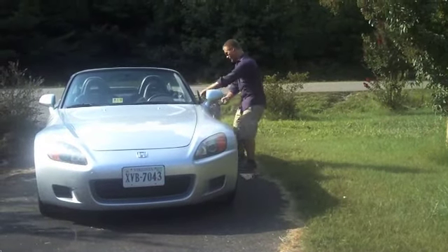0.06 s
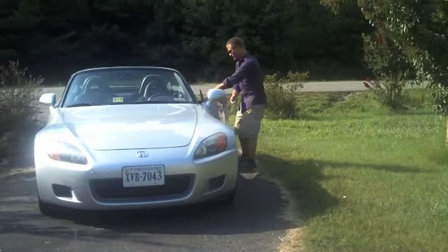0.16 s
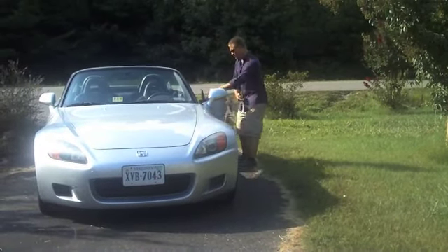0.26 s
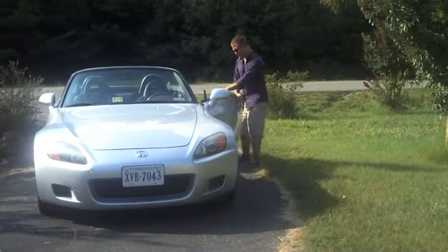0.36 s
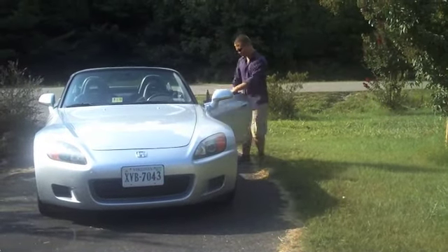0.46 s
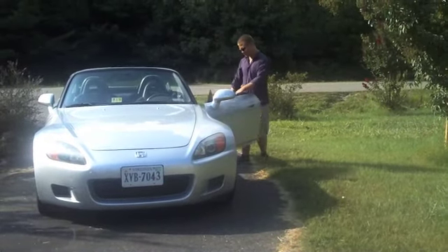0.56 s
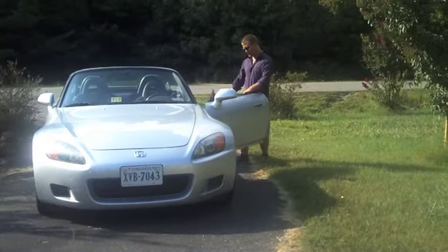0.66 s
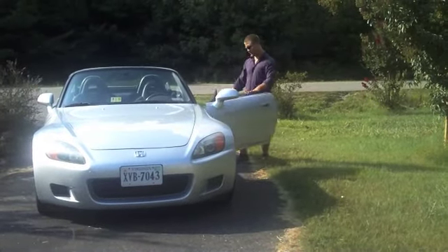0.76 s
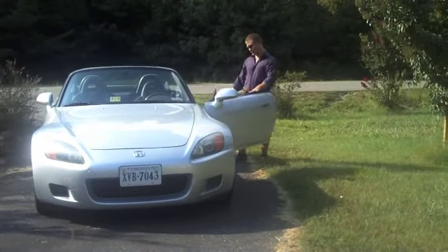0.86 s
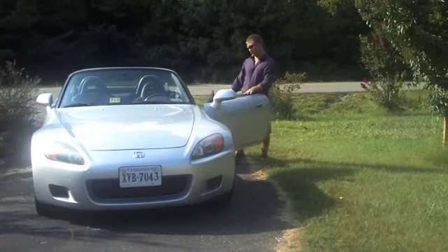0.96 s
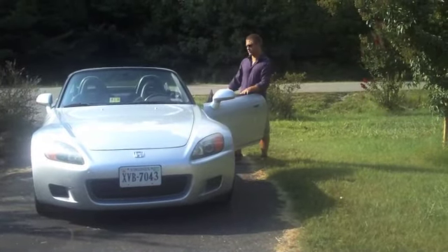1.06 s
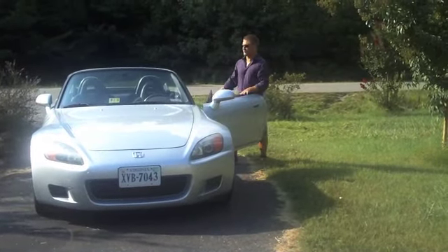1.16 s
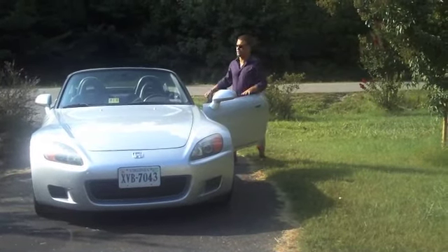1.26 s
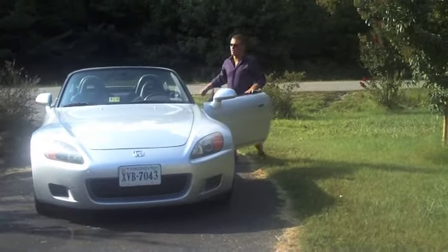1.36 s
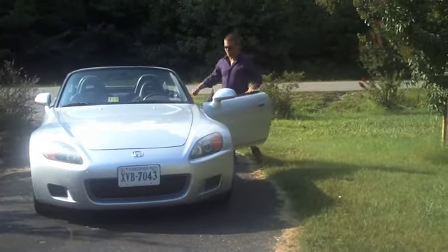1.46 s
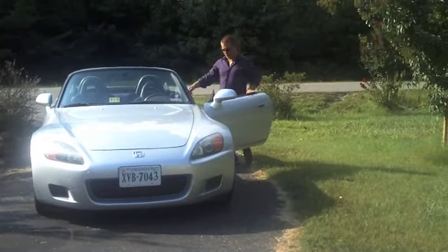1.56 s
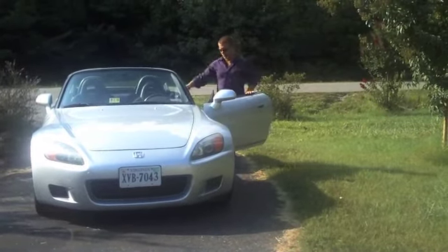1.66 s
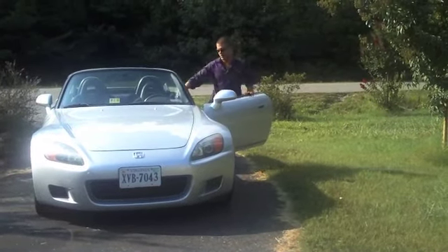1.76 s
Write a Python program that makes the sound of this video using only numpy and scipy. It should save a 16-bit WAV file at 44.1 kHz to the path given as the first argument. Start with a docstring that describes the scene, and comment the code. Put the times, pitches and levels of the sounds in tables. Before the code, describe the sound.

A car door is opened: a sharp metallic latch click with a low, short thump, then rubber seal scuffs and a soft hinge knock, over faint bird chirps and distant rumble, with a gritty low-quality microphone.

```python
"""Car door opening on a quiet lawn

Steel clicks and door modes make the latch snap; a low sine thumps as the panel leaves its seal.
Grainy noise scuffs like rubber, and a few modes give the soft knock of the hinge stay.
Swept sines chirp faintly like a bird over coloured-noise rumble, rustle and a late soft rush.
A low-rate sample and hold mirrors the sound into a gritty treble.
"""
import sys
import numpy as np
from scipy import signal
from scipy.fft import rfft, irfft
from scipy.io import wavfile
from scipy.ndimage import uniform_filter1d

SR = 44100
rng = np.random.default_rng(int(sys.argv[2]) if len(sys.argv) > 2 else 0)


def unload_audio(sound):
    """Save the sound as a 16-bit wav file, at the path given as the first command line argument."""
    columns = np.transpose(np.atleast_2d(sound))
    # keep every value between -1 and 1, then stretch to whole-number steps
    steps = np.round(np.clip(columns, -1, 1) * 32767)
    wavfile.write(sys.argv[1], SR, steps.astype(np.int16))


N = 79380  # length [samples]
CONTACT_S = 0.00018  # time constant of a hard contact's onset


def undb(db):
    """Decibels to gain."""
    return 10 ** (np.asarray(db) / 20)


def since(start):
    """Seconds since a moment, zero before it."""
    return np.maximum(np.arange(N) / SR - start, 0)


def fade(start, rise, t60):
    """Envelope of a blow: rise with a time constant, exponential fall by 60 dB in t60 seconds."""
    t = since(start)
    return (1 - np.exp(-t / rise)) * np.exp(-np.log(1000) * t / t60)


def colour(x, points):
    """Filter by a (frequency [Hz], level [dB]) curve, drawn on a log frequency axis."""
    hz, db = np.array(points, float).T
    f = np.maximum(np.arange(N // 2 + 1) * SR / N, 1)
    gain = undb(np.interp(np.log(f), np.log(hz), db))
    return irfft(rfft(x) * gain, N)


def noise(points, grain_db=0):
    """Coloured noise of unit RMS; grain gives each run of 20 samples its own random size."""
    grains = np.repeat(rng.standard_normal(N // 20 + 1), 20)[:N]
    x = colour(rng.standard_normal(N) * undb(grain_db * grains), points)
    return x / x.std()


def walk(rate):
    """Smooth random wander around zero, with `rate` new targets a second."""
    k = int(SR / rate)
    steps = np.repeat(rng.standard_normal(N // k + 1), k)
    return uniform_filter1d(uniform_filter1d(steps, k), k)[:N]


def swell(points, levels):
    """Coloured noise that follows a (time [s], level [dB]) curve."""
    return noise(points) * undb(np.interp(since(0), *np.array(levels).T))


def ring(start, modes):
    """Struck modes: sines that start together and die away at their own rates."""
    t = since(start)
    return sum(undb(db) * fade(start, CONTACT_S, t60) * np.sin(2 * np.pi * hz * t)
               for hz, db, t60 in modes)


# colour of the microphone hiss: (frequency [Hz], relative level [dB])
HISS_COLOUR = [(100, 14), (700, -6), (3000, 5.5), (5700, 1)]
HISS_DB = -72


def hiss():
    """Microphone hiss: unrelated noise on left and right."""
    return undb(HISS_DB) * np.array([noise(HISS_COLOUR), noise(HISS_COLOUR)])


# colour of the distant outdoor rumble: (frequency [Hz], relative level [dB])
AIR_COLOUR = [(8, -15.5), (20, -2), (48, 0.5), (85, -8.5), (124, -11), (200, -17), (350, -20.5), (550, -25),
              (800, -26.5), (1040, -26.5), (2200, -35.5), (4800, -39.5), (5700, -47.5)]
AIR_DB, AIR_WAVER_DB = -50.5, 1
# level of the soft rush before flutter: (time [s], level [dB])
RUSH_SWELL = [(1.15, -72), (1.21, -61), (1.3, -57), (1.37, -65), (1.5, -62), (1.59, -57.5), (1.69, -68),
              (1.8, -62)]
# colour of the soft rush: (frequency [Hz], relative level [dB])
RUSH_COLOUR = [(100, -31), (250, 13), (550, 13), (1100, -6.5), (2500, -34.5), (5700, -53)]


def outdoors(flutter_db=2.5):
    """Gently wavering distant rumble, and a soft, fluttering rush that swells late."""
    rumble = undb(AIR_DB) * noise(AIR_COLOUR) * undb(AIR_WAVER_DB * walk(8.7))
    rush = swell(RUSH_COLOUR, RUSH_SWELL) * undb(flutter_db * walk(40))
    return rumble + rush


CHIRP_HALF_S, ARCH_DROP = .024, .25  # half length; share of the top pitch lost at either end
CHIRP_ROUGH_DB, CHIRP_JITTER, OCTAVE_DB = 5, .022, -13  # level wander, pitch wander, octave level


def arch(middle, top_hz):
    """One raspy whistle: pitch rises and falls in a parabola, with a weak octave."""
    u = np.clip((np.arange(N) / SR - middle) / CHIRP_HALF_S, -1, 1)
    hz = top_hz * (1 - ARCH_DROP * u ** 2) * (1 + CHIRP_JITTER * walk(600))
    phase = 2 * np.pi * np.cumsum(hz) / SR
    voice = np.sin(phase) + undb(OCTAVE_DB) * np.sin(2 * phase)
    return np.sqrt(1 - u ** 2) * voice * undb(CHIRP_ROUGH_DB * walk(260))


# chirps, lower voice before its wander: (time of the arch's top [s], top pitch [Hz], level [dB])
BIRD_CHIRPS = [(0.065, 2246, -57), (0.177, 2290, -55), (0.465, 2134, -58), (0.622, 2100, -64)]
UPPER_RATIO, UPPER_DB, UPPER_LAG_S = 1.43, -9, .007  # upper voice against the lower


def bird():
    """Faint chirps of two voices, the upper one weaker and slightly late."""
    chirps = 0
    for s, hz, db in BIRD_CHIRPS:
        upper = undb(UPPER_DB) * arch(s + UPPER_LAG_S, hz * UPPER_RATIO)
        chirps = chirps + undb(db) * (arch(s, hz) + upper)
    return chirps


# level of the rustle before flutter: (time [s], level [dB])
RUSTLE_SWELL = [(0, -57.5), (0.058, -52.5), (0.14, -61.5), (0.4, -56), (0.55, -57.5), (0.7, -58.5),
                (0.95, -67)]
# colour of the rustle: (frequency [Hz], relative level [dB])
RUSTLE_COLOUR = [(40, 1), (120, 8), (220, -3), (500, 1), (1050, -8), (2000, -12), (5000, -24.5)]


def rustle(flutter_db=2):
    """Uneven rustle of clothes and the swinging door: fluttering coloured noise."""
    return swell(RUSTLE_COLOUR, RUSTLE_SWELL) * undb(flutter_db * walk(60.3))


# colour of the clunk's stereo width: (frequency [Hz], relative level [dB])
CLUNK_WIDTH_COLOUR = [(60, 2), (150, 8), (300, 1), (650, -12), (1000, -23), (3000, -37)]
CLUNK_WIDTH_DB, CLUNK_WIDTH_T60_S = -38, .1


def clunk_width():
    """A brief noise burst, opposite in sign left and right, widens the clunk."""
    burst = noise(CLUNK_WIDTH_COLOUR) * fade(LATCH_SNAPS[0][0], CONTACT_S, CLUNK_WIDTH_T60_S)
    return undb(CLUNK_WIDTH_DB) * burst * np.array([[1], [-1]])


# colour of the diffuse ring of the car body: (frequency [Hz], relative level [dB])
BODY_COLOUR = [(80, 2), (140, 3), (350, -3), (680, -12), (1050, 0), (1400, -12), (2700, -20), (5500, -29)]
BODY_DB, BODY_T60_S = -33.5, 0.25


def body():
    """The car body rings on diffusely after the first snap: dying coloured noise."""
    return undb(BODY_DB) * noise(BODY_COLOUR) * fade(LATCH_SNAPS[0][0], PANEL_PUSH_S, BODY_T60_S)


# modes of the hinge stay: (frequency [Hz], level [dB], t60 [s])
STAY_MODES = [(414, -41.5, 0.07), (1036, -51, 0.11), (1100, -59, 0.089)]


def hinge_stay():
    """The hinge stay knocks softly once, ringing its few modes."""
    return ring(0.521, STAY_MODES)


# scuffs of the rubber seal: (time [s], level [dB])
SEAL_SCUFFS = [(0.2985, -37), (0.313, -49.5), (0.3215, -43)]
# colour of a scuff: (frequency [Hz], relative level [dB])
SEAL_COLOUR = [(300, 11.5), (700, 1.5), (1050, 8.5), (1350, -5), (1750, 3), (2700, -8), (3900, -17),
               (4250, -8), (4550, -21), (5100, -11.5), (5700, -32)]
SCUFF_RISE_S, SCUFF_T60_S, SCUFF_GRAIN_DB = 0.0014, 0.13, 2.5


def seal():
    """The rubber slips free in a few scuffs of grainy noise."""
    scuffs = sum(undb(db) * fade(s, SCUFF_RISE_S, SCUFF_T60_S) for s, db in SEAL_SCUFFS)
    return noise(SEAL_COLOUR, grain_db=SCUFF_GRAIN_DB) * scuffs


# thumps of the door panel: (time [s], level [dB])
PANEL_THUMPS = [(0.2475, -10.5), (0.332, -27)]
PANEL_HZ, PANEL_T60_S, PANEL_PUSH_S = 127.4, .076, .0045  # pitch, decay, onset time constant


def panel():
    """The door skin booms as one low mode when it springs out, and again as the seal lets go."""
    return sum(undb(db) * fade(s, PANEL_PUSH_S, PANEL_T60_S) * np.sin(2 * np.pi * PANEL_HZ * since(s))
               for s, db in PANEL_THUMPS)


# clicks of the steel latch: (time [s], gain of its ring [dB], gain of its crack [dB])
LATCH_SNAPS = [(0.2388, -3, -16), (0.2407, -3, 1.5), (0.254, -15.5, -10), (0.3027, -20, -26),
               (0.3218, -14, -22)]
# modes of the steel latch: (frequency [Hz], relative level [dB], t60 [s])
LATCH_MODES = [(1990, -41, 0.026), (2470, -35, .06), (2644, -36.5, 0.065), (2805, -36.5, 0.064),
               (3220, -42.5, 0.046), (4250, -33.5, 0.037), (5320, -43, 0.05)]
# colour of the crack: (frequency [Hz], relative level [dB])
CRACK_COLOUR = [(200, 0), (650, -6), (1000, 9), (1600, -12), (2600, -4.5), (3700, -13.5), (4250, -8),
                (4600, -16), (5700, -11.5)]
CRACK_DB, CRACK_T60_S = -25, 0.034  # level before each click's gain, decay
# jolts that handle and latch give the door: (time [s], gain [dB])
DOOR_JOLTS = [(0.095, -38), (0.204, -34), (0.23877, -1.3), (0.24226, -13), (0.25096, -9)]
# modes of the door: (frequency [Hz], relative level [dB], t60 [s])
DOOR_MODES = [(249, -31, .24), (272, -29, .2), (332, -24, .094), (370, -19, .15), (428, -34, .19),
              (549, -39, .11), (864, -34, .08), (948, -22, .065), (999, -21, .075), (1042, -28, .11),
              (1115, -23, .075), (1333, -36, .1), (1500, -40, .08)]


def latch():
    """Each click cracks as noise and rings the steel's modes; each jolt rings the door's modes."""
    crack = undb(CRACK_DB) * noise(CRACK_COLOUR)
    clicks = 0
    for s, ring_db, crack_db in LATCH_SNAPS:
        steel = undb(ring_db) * ring(s, LATCH_MODES)
        clicks = clicks + steel + undb(crack_db) * crack * fade(s, CONTACT_S, CRACK_T60_S)
    return clicks + sum(undb(db) * ring(s, DOOR_MODES) for s, db in DOOR_JOLTS)


def scene():
    """Door, bird and outdoors straight ahead; only the clunk's width burst and the hiss are wide."""
    background = outdoors() + bird() + rustle()
    door = body() + hinge_stay() + seal() + panel() + latch()
    return background + door + clunk_width() + hiss()


HOLD_HZ, INPUT_TOP_HZ, TOP_HZ = 12000, 5750, 15250  # sample rate, band limits before and after
OFFSET = (-.0016, -.0008)  # constant converter offset, left and right [full scale]


def record(dry):
    """Band-limit, sample and hold at the low rate with a slight converter offset, cut the top."""
    input_filter = signal.ellip(8, .3, 60, INPUT_TOP_HZ, fs=SR, output="sos")
    narrow = signal.sosfilt(input_filter, dry)
    samples = signal.resample(narrow, N * HOLD_HZ // SR, axis=1)
    stairs = np.repeat(samples, 8, axis=1)  # flat steps leave mirror images above the band
    held = signal.resample(stairs, N, axis=1) + np.array(OFFSET)[:, None]
    return signal.sosfilt(signal.ellip(10, .2, 80, TOP_HZ, fs=SR, output="sos"), held)


dry = scene()
out = record(dry)
unload_audio(out)
```